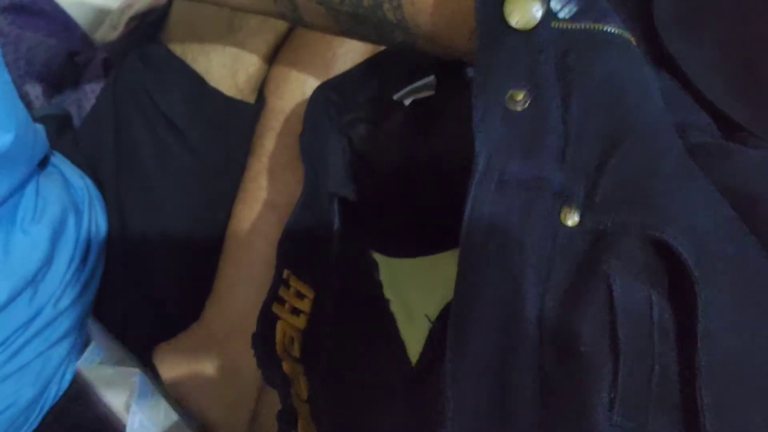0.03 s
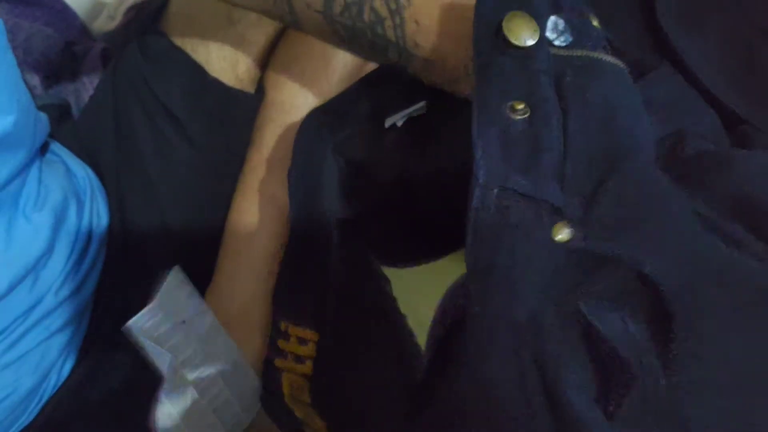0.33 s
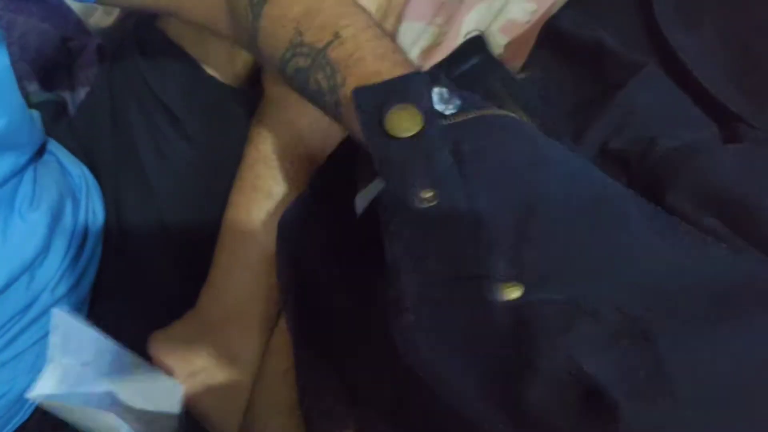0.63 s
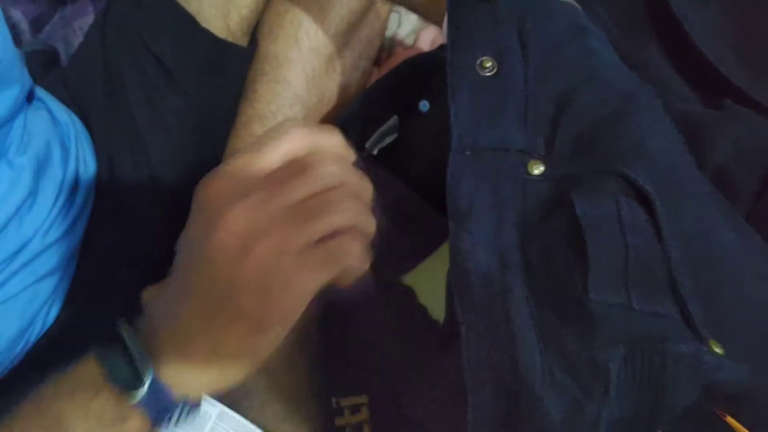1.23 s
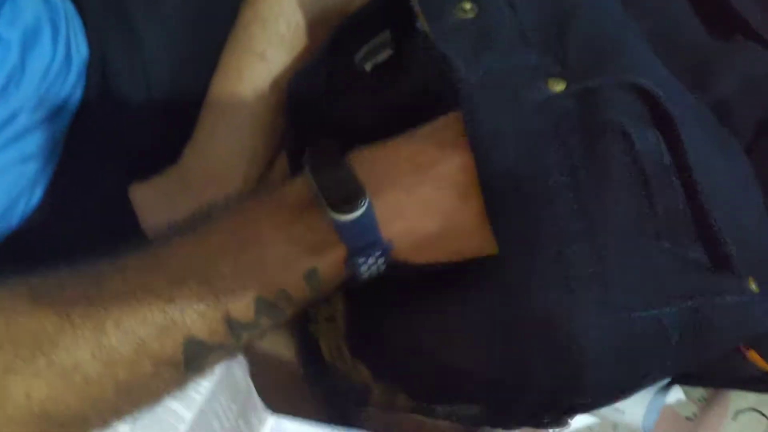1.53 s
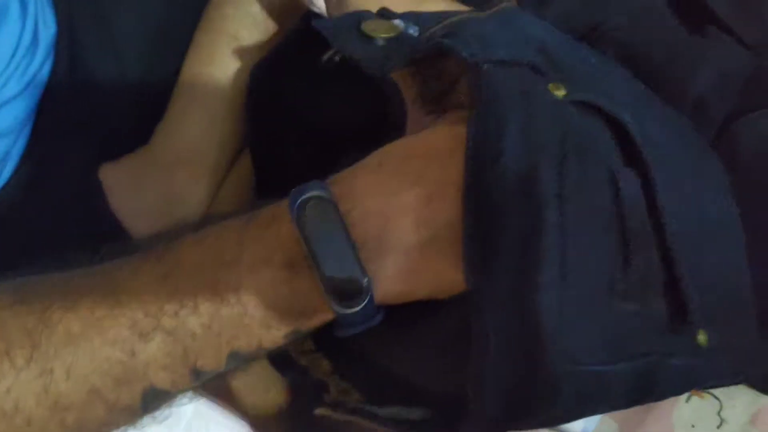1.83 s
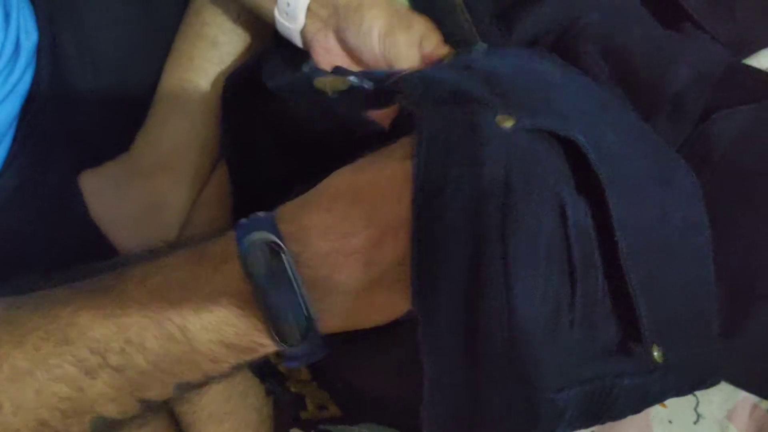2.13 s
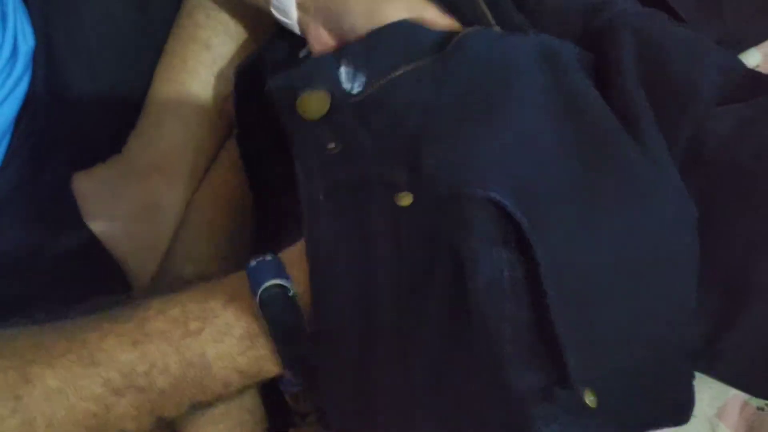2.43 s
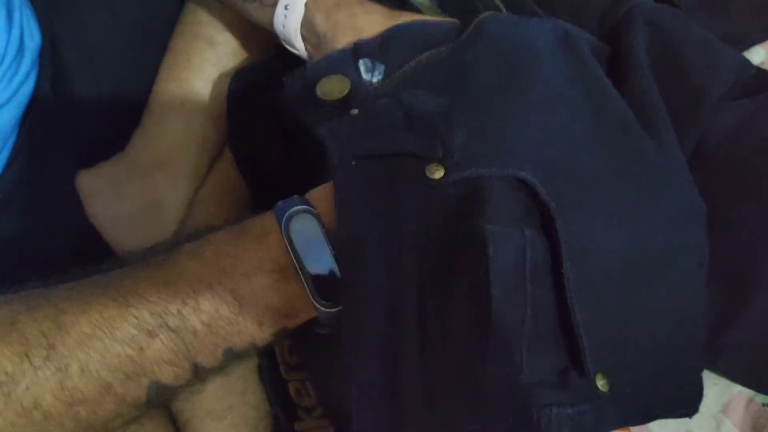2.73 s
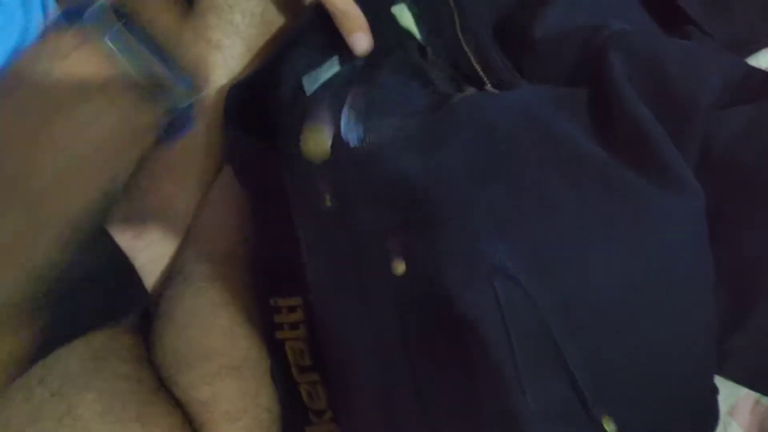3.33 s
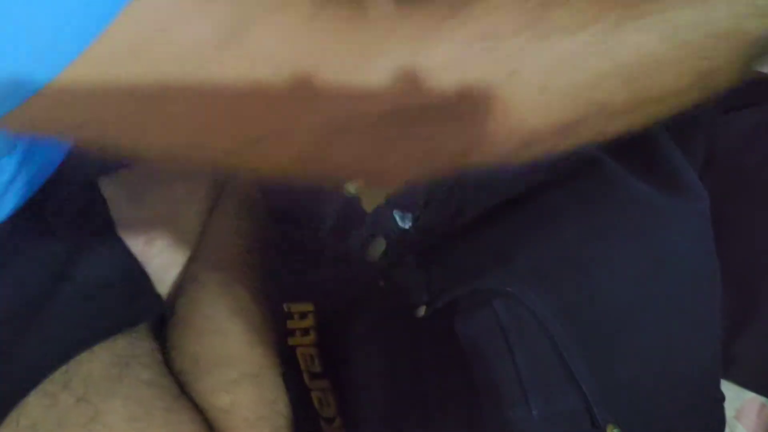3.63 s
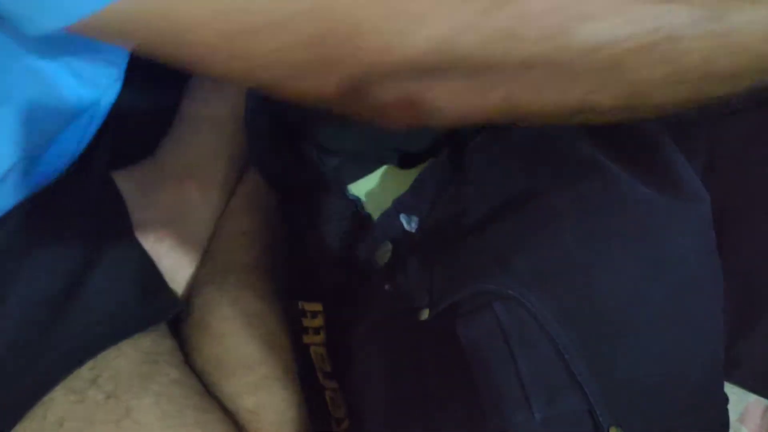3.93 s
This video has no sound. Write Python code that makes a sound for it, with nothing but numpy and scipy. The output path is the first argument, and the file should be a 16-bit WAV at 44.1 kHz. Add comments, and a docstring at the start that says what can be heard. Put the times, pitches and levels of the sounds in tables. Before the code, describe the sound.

Low fan wind buffets the microphone while a jacket rustles softly.

```python
"""Searching a jacket beside a fan

A heavy cloth jacket is turned over by hand, close to a small stereo microphone. Stick-slip friction
makes it slide and crease softly, and its metal fittings give one brief jingle. A fan roars steadily;
its turbulent draught buffets the two microphone ports in turn with low, lumpy gusts, under which
the gain sinks a little."""
import sys
import numpy as np
from scipy import signal
from scipy.fft import rfft, irfft
from scipy.io import wavfile
from scipy.ndimage import uniform_filter1d

SR = 44100
rng = np.random.default_rng(int(sys.argv[2]) if len(sys.argv) > 2 else 0)


def output_pcm(signal):
    """Save a mono or channel-first signal as 16-bit PCM at the path in sys.argv[1].

    Samples are clipped to [-1, 1] before scaling.
    """
    pcm = np.clip(np.atleast_2d(signal).T, -1, 1) * 32767
    wavfile.write(sys.argv[1], SR, np.round(pcm).astype(np.int16))


N = 176400

# Cloth sliding on cloth: centre t/s, half-height width/s, level/dB, tilt/(dB/octave), emphasised f/Hz
SLIDES = [(0.12, 0.12, -47.5, -5, 895), (0.427, 0.11, -53.5, -2, 5170), (0.54, 0.11, -52.5, -1, 1700),
          (0.626, 0.069, -42.5, 0, 1800), (0.703, 0.096, -48.5, -2.5, 1700),
          (0.769, 0.028, -49, -3.5, 2000), (0.804, .06, -56, 2, 1800), (0.852, 0.08, -47.5, -5, 2200),
          (0.94, 0.082, -52, 0, 5200), (1.086, 0.13, -63, 3, 4000), (1.415, 0.032, -55, 0, 4500),
          (1.72, 0.2, -64, 3, 4000), (1.787, 0.2, -46, -7.5, 880), (2.035, 0.065, -41.5, -11, 900),
          (2.07, 0.25, -65, 3, 2000), (2.185, 0.13, -45.5, -12.5, 850), (2.249, 0.052, -60, 3, 1900),
          (2.36, 0.22, -50, -5, 1390), (3.104, 0.14, -48.5, -7.5, 850), (3.19, 0.15, -65.5, 5, 4500),
          (3.318, 0.2, -49.5, -8.5, 1000), (3.69, 0.85, -52, -5, 900), (3.84, .2, -68, 0, 2000)]
# Creases that snap: t/s, level/dB, tilt/(dB/octave), emphasised f/Hz
CREASES = [(.757, -46, -2, 3400), (0.859, -49.5, 2, 4800), (.886, -40, -5, 1900), (1.074, -38.5, -8, 1150),
           (2.483, -48, -1.5, 3800), (2.563, -59, 2, 5000), (3.442, -45, -10, 950)]
# Friction spectrum: f/Hz, relative level/dB
CLOTH_SPECTRUM = [(200, -32), (700, -5.5), (1300, 0.5), (1800, -6.5), (2400, -2), (3100, -6), (4200, -9.5),
                  (6800, -10.5), (8500, -19), (11000, -20.5), (15500, -20.5)]
# Stereo balance of the friction: f/Hz, left minus right level/dB
CLOTH_BALANCE = [(500, -3), (3000, 1.5), (7500, -3), (10000, 4.5), (15000, 11)]
def cloth(slips_per_s=9000, crease_decay_s=.0076, emphasis_db=5, emphasis_octaves=.44):
    """Stick-slip friction: fibres catch and let go, swelling in a slide, dying at once in a crease."""
    t, hz = np.arange(N) / SR, np.fft.rfftfreq(N, 1 / SR)
    fibres = rfft(np.array([impulses(slips_per_s, spread_db=1.5) for _ in range(2)]))
    fibres *= amp(curve(CLOTH_SPECTRUM, hz) + curve(CLOTH_BALANCE, hz) * np.array([[.5], [-.5]]))
    octaves = np.log2(np.maximum(hz, 800))
    moves = [(bell(t - s, width, squareness=1.94), *voice) for s, width, *voice in SLIDES]
    moves += [((t > s) * np.exp(-abs(t - s) / crease_decay_s), *voice) for s, *voice in CREASES]
    out = np.zeros((2, N))
    for envelope, db, tilt, emphasis_hz in moves:
        peak = bell(np.log2((hz + 1) / emphasis_hz), emphasis_octaves)
        friction = irfft(fibres * amp(tilt * octaves + emphasis_db * peak), N)
        out += envelope * amp(db) * unit(friction)
    return out


# Modes of the metal fittings: f/Hz, relative level/dB, T60/s
FITTING_MODES = [(1728, 1, .1), (2891, -8, .62), (3090, 2, .06), (3790, -1, .04), (3973, -3, .1),
                 (5778, -7, .12), (6800, -7, .05), (7263, -9, .12)]
# Impacts as the jacket swings over: t/s, level/dB
CLINKS = [(.596, -52), (0.603, -52), (.609, -48), (.618, -49), (.632, -55), (.649, -51)]
def metal_fittings(rubbing, coupling_db=-29, spread_db=3.5):
    """Modal resonance: rubbing drives the damped modes faintly, and impacts set them ringing freely."""
    t = np.arange(SR // 2) / SR
    hz, db, t60 = np.transpose(FITTING_MODES)[:, :, None]
    decay, angle = amp(db - 60 * t / t60), 2 * np.pi * hz * t
    response = (decay * np.sin(angle)).sum(0)
    response *= amp(coupling_db) / np.linalg.norm(response)
    out = signal.oaconvolve(rubbing, response[None], axes=1)[:, :N]
    for s, level_db in CLINKS:  # each impact favours different modes
        weights = amp(level_db + spread_db * rng.standard_normal((2, len(hz), 1)))
        phase = 2 * np.pi * rng.random((2, len(hz), 1))
        start = round(s * SR)
        out[:, start:start + len(t)] += (weights * decay * np.sin(angle + phase)).sum(1)
    return out


# Colouring of the eddy pressure: f/Hz, relative gain/dB
EDDY_TONE = [(20, -32), (50, -5.5), (100, 1), (200, 2), (350, 0), (600, -9), (1200, 9), (4000, -30)]
def turbulence(eddies_per_s=650, eddy_s=.0019, steady_s=.041, steadiness=.64):
    """Superposition: pressure pulses from eddies of many sizes add up to a rumble of rms 1."""
    lag = np.arange(-512, 513) / SR
    widths = eddy_s * np.exp(.26 * np.linspace(-2, 2, 7))
    pressure = np.zeros(N)
    for width in widths:
        arrivals = impulses(eddies_per_s / len(widths), spread_db=2)
        pressure += signal.oaconvolve(arrivals, bell(lag, width), "same")
    flow = colour(port(pressure), EDDY_TONE)
    window = bell((np.arange(SR // 4) - SR // 8) / SR, steady_s)
    strength = np.sqrt(signal.oaconvolve(flow ** 2, window, "same"))
    flutter = amp(drift(rate_hz=33))  # 1 dB rms
    return unit(flow / strength ** steadiness * flutter)  # the division partly evens out the strength


# Gusts: start t/s, end t/s, coarse-eddy level/dB, fine re coarse level/dB, port (0 left, 1 right)
GUSTS = [(0, 0.12, -51, -5.0, 0), (0.012, 0.07, -35.5, -19, 1), (0.117, 0.274, -28.5, -9, 0),
         (0.325, 0.437, -30.5, -15, 1), (0.489, 0.588, -28.5, -8, 0), (0.496, 0.787, -40, -23, 1),
         (0.664, 0.802, -35, -23, 0), (0.814, 0.898, -29, -7, 1), (0.939, 1.1, -31.5, -7, 1),
         (1.127, 1.244, -30, -5.5, 1), (0.812, 1.02, -29.5, -4.5, 0), (1.055, 1.71, -34.5, -6, 0),
         (1.253, 1.313, -25, 2, 1), (1.327, 1.473, -27.5, 4.5, 1), (1.499, 1.596, -25, 4.5, 1),
         (1.592, 1.702, -33.5, -2, 1), (1.862, 1.964, -29, -15, 0), (2.063, 2.105, -28.5, -20, 1),
         (2.308, 2.411, -24.5, -3, 1), (2.367, 2.462, -27.5, -6, 0), (2.422, 2.46, -30.5, -3, 1),
         (2.46, 2.582, -27.5, -1.5, 1), (2.474, 2.573, -24.5, -0.5, 0), (2.593, 2.688, -26, -15, 0),
         (2.622, 2.707, -26, -0.5, 1), (2.713, 2.888, -34, -4.5, 0), (2.838, 2.947, -26, 0.5, 1),
         (2.96, 3.015, -25, -10, 1), (3.198, 3.233, -26, -10, 1), (3.435, 3.571, -29, -7.5, 0),
         (3.613, 3.66, -31, -8, 0), (3.757, 3.986, -32.5, -12, 1)]
# Single strong eddies: t/s, incident peak level/dB, width/s, sign (1 push, -1 suction), port
THUMPS = [(0.1632, -8.5, 0.0018, 1, 0), (0.1661, -11, 0.0032, -1, 0), (0.561, -12.5, 0.0022, 1, 0),
          (0.8255, -19.5, 0.0049, -1, 1), (0.8459, -15, 0.0022, 1, 1), (0.8542, -19, 0.0032, -1, 0),
          (0.9195, -12, 0.0017, 1, 0), (0.9663, -19, 0.002, 1, 0), (1.089, -19, 0.0025, 1, 1),
          (1.129, -14.5, 0.0018, 1, 1), (1.2834, -16, 0.0012, 1, 1), (1.3703, -14.5, 0.0016, 1, 1),
          (1.459, -10, 0.0026, 1, 1), (1.525, -8.5, 0.0012, -1, 1), (1.55, -18, 0.0024, 1, 1),
          (2.3659, -12.5, 0.0019, -1, 1), (2.3922, -8, 0.0018, 1, 1), (2.4813, -5.5, 0.002, 1, 0),
          (2.4939, -10, 0.0036, 1, 0), (2.505, -8, 0.0026, 1, 0), (2.5123, -18.5, 0.002, -1, 1),
          (2.5763, -10, 0.0026, 1, 0), (2.6314, -6.5, 0.0022, 1, 0), (2.6677, -13.5, 0.0016, 1, 0),
          (2.6915, -15, 0.0021, -1, 1), (2.7336, -16, 0.0022, -1, 0), (2.744, -10, 0.0016, 1, 0),
          (2.8191, -8.5, 0.002, 1, 1), (2.8241, -9, 0.0021, 1, 1), (2.8534, -13, 0.0023, 1, 1),
          (2.8631, -20, 0.002, 1, 1), (2.9259, -10, 0.0012, 1, 1), (2.997, -13.5, 0.0021, 1, 1)]
def draught(lull_db=-43.5, edge_s=.014, crossover_hz=186):
    """Wind noise: turbulent pressure on each port grows in the gusts, and a few strong eddies thump."""
    t, out = np.arange(N) / SR, np.zeros((2, N))
    for side in range(2):
        power = np.full((2, N), amp(lull_db) ** 2)  # rows: coarse, fine
        for start, end, db, fine_db, gust_side in GUSTS:
            if gust_side == side:
                envelope = np.clip(np.minimum(t - start, end - t) / edge_s + .5, 0, 1)
                power += amp([[db], [db + fine_db]]) ** 2 * envelope
        coarse_gain, fine_gain = np.sqrt(power)
        flow = turbulence()
        coarse = signal.filtfilt(*signal.butter(3, crossover_hz, fs=SR), flow)
        out[side] = coarse_gain * coarse + fine_gain * (flow - coarse)
    for s, db, width, sign, side in THUMPS:
        out[round(side)] += port(sign * amp(db) * bell(t - s, width))
    return out


def port(pressure, cutoff_hz=54.7):
    """High-pass response: a port passes little deep bass, so each push is followed by a rebound."""
    return signal.lfilter(*signal.butter(2, cutoff_hz, "high", fs=SR), pressure)


# The fan in the room: f/Hz, relative spectral density level/dB
FAN_SPECTRUM = [(20, -9), (60, 2.5), (130, -4.5), (300, 0.5), (430, 0), (600, -7.5), (770, -2.5), (980, -3),
                (1150, -7.5), (1450, -7), (2000, -13), (3200, -21.5), (5000, -26.5), (7200, -32),
                (8800, -39), (15500, -41.5)]
# Likeness of the roar at the two ports: f/Hz, correlation coefficient
FAN_CORRELATION = [(60, 0.53), (130, 0.86), (290, 1), (640, 0.46), (1400, 0.0013), (3100, 0), (15000, 0)]
def fan(level_db=-41.5, right_bias_db=1.4, patch_db=.7, swell_db=.5):
    """Aerodynamic noise: moving air roars steadily, coherent at both ports in the low middle range."""
    frames, hz = N // 256 + 5, np.fft.rfftfreq(1024, 1 / SR)
    a, b, c, d, patches = rng.standard_normal((frames, len(hz), 5)).T
    left, independent = a + 1j * b, c + 1j * d
    correlation = curve(FAN_CORRELATION, hz)[:, None]
    right = correlation * left + np.sqrt(1 - correlation ** 2) * independent
    for axis in (0, 1):  # the level drifts in patches of frequency and time
        patches = uniform_filter1d(patches, size=12, axis=axis)
    spectra = np.array([left, right]) * amp(curve(FAN_SPECTRUM, hz)[:, None] + patch_db * unit(patches))
    roar = unit(signal.istft(spectra, nperseg=1024, noverlap=768)[1][:, :N])
    return roar * amp(level_db + swell_db * drift(rate_hz=12) + right_bias_db * np.array([[-.5], [.5]]))


def room(x, level_db=-18.5, t60_s=.24):
    """Reverberation: diffuse reflections decay exponentially in a small furnished room."""
    t = np.arange(SR // 2) / SR
    tail = rng.standard_normal((2, len(t))) * amp(-60 * t / t60_s) * (t > .004)
    return amp(level_db) * signal.oaconvolve(x, tail / np.linalg.norm(tail[0]), axes=1)[:, :N]


def amp(db):
    """Amplitude ratio of a level in decibels."""
    return 10 ** (np.asarray(db) / 20)


def unit(x):
    """Normalisation to rms 1."""
    return x / np.sqrt(np.mean(x ** 2) + 1e-20)


def curve(points, hz):
    """Interpolation of a table on a logarithmic frequency axis."""
    f, value = np.transpose(points)
    return np.interp(np.log(hz + 1), np.log(f + 1), value)


def colour(x, points):
    """Zero-phase filtering by a table of f/Hz, gain/dB."""
    return irfft(rfft(x) * amp(curve(points, np.fft.rfftfreq(N, 1 / SR))), N)


def drift(rate_hz):
    """Band-limited noise: a slow wander of rms 1."""
    passband = np.fft.rfftfreq(N, 1 / SR) < rate_hz
    return unit(irfft(rfft(rng.standard_normal(N)) * passband, N))


def impulses(per_s, spread_db):
    """Poisson process: independent clicks of uneven size and either sign."""
    size = amp(spread_db * np.minimum(rng.exponential(1, N), 4))
    return size * rng.choice([-1, 1], N) * (rng.random(N) < per_s / SR)


def bell(x, width, squareness=2):
    """Generalised Gaussian of height 1 and the given full width at half height."""
    return .5 ** (abs(2 * x / width) ** squareness)


def scene():
    """Superposition: the jacket, its reverberation, the fan and the draught add at the microphone."""
    rubbing = cloth()
    jacket = rubbing + metal_fittings(rubbing)
    return jacket + room(jacket) + fan() + draught()


def record(dry, threshold_db=-29.5, cut_db_per_db=.2, release_db_per_s=34, cutoff_hz=15750):
    """Compression and band limiting: the gain sinks under the gusts, then a low-pass trims the top."""
    power = uniform_filter1d((dry ** 2).mean(0), size=5000)
    level_db = 10 * np.log10(abs(power) + 1e-12)
    release_db = np.arange(N) * release_db_per_s / SR
    held_db = np.maximum.accumulate(level_db + release_db) - release_db  # peaks, falling back steadily
    excess_db = np.maximum(held_db - threshold_db, 0)
    ducked = dry * amp(-cut_db_per_db * uniform_filter1d(excess_db, size=2500))
    lowpass = signal.firwin(1023, cutoff_hz, window=("kaiser", 9), fs=SR)
    return signal.oaconvolve(ducked, lowpass[None], "same")


dry = scene()
out = record(dry)
output_pcm(out)
```